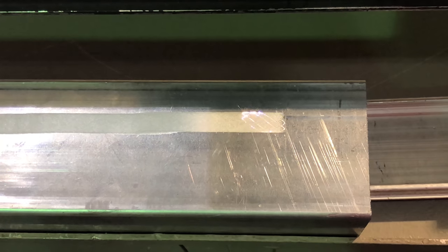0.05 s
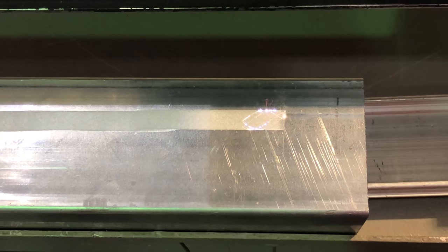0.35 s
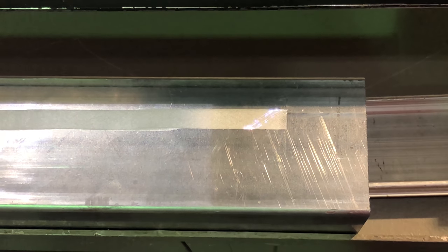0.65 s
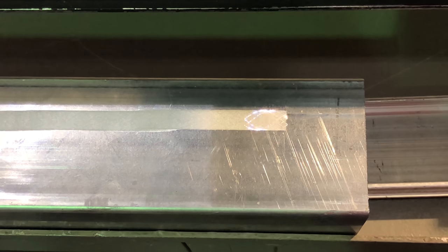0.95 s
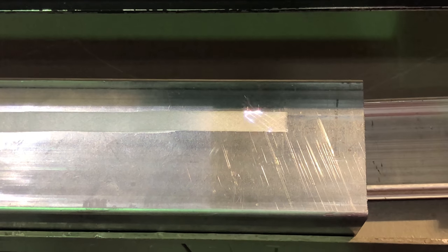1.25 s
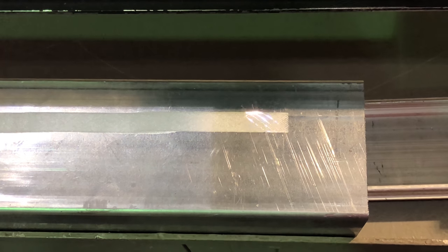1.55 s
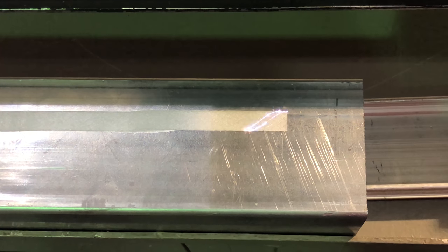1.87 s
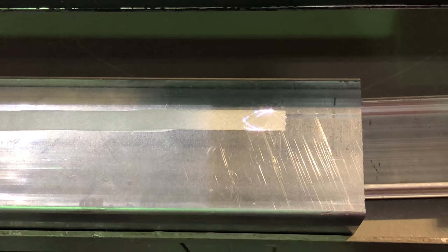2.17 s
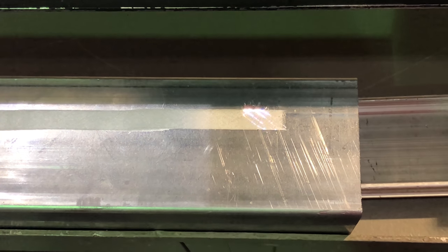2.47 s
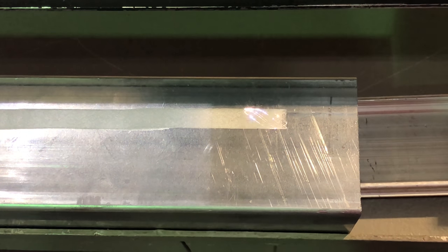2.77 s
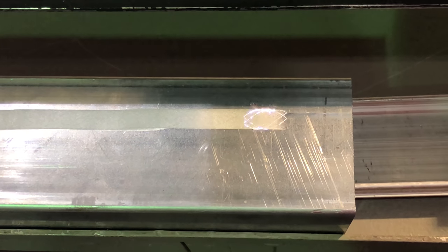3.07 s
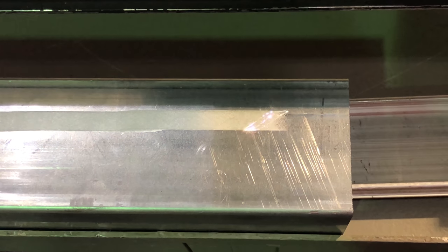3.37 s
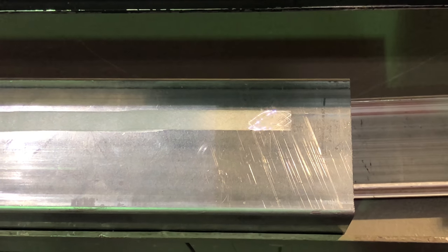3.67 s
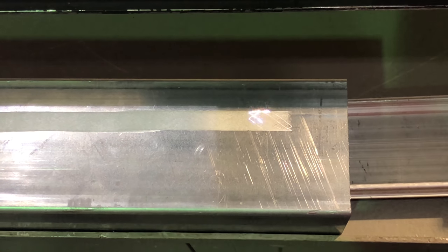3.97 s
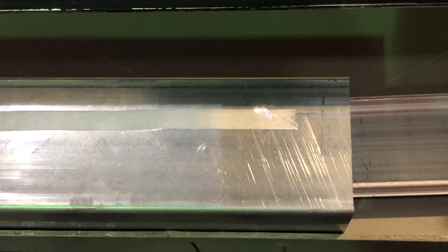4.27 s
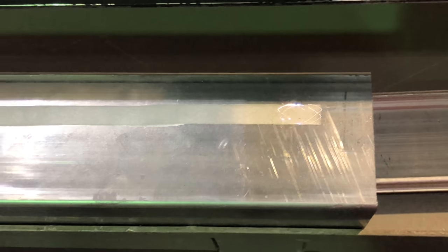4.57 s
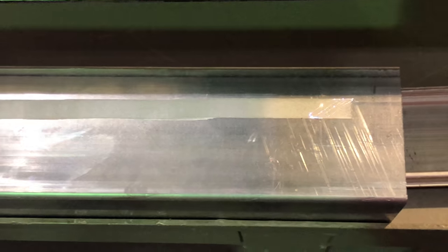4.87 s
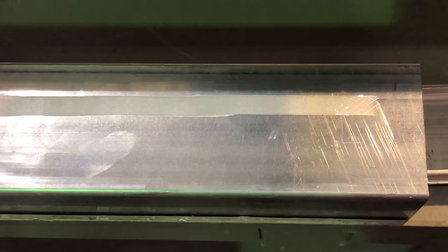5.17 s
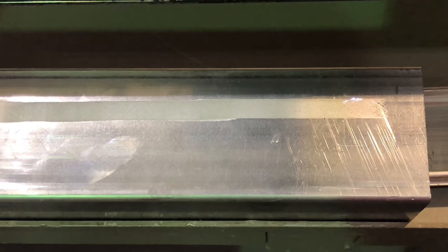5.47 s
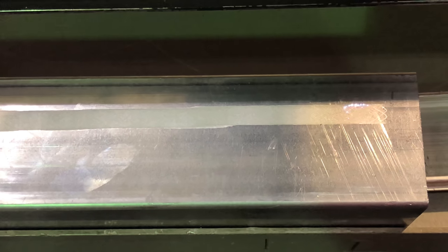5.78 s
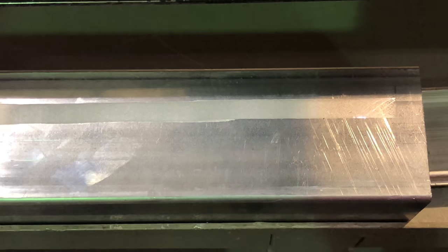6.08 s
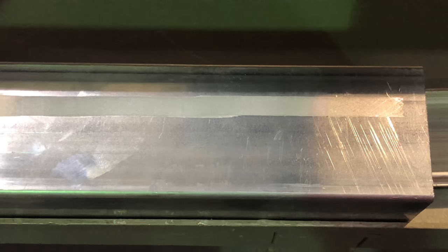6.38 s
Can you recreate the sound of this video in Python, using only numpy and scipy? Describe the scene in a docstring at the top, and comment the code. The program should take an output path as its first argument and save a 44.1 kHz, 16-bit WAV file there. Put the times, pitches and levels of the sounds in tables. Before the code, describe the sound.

A cleaning laser strips a steel tube with a fluttering sizzle and sharp snaps, over hissing air and machine hum.

```python
"""In a workshop, one microphone hears a handheld cleaning laser strip a steel tube.
Two mirrors sweep the spot; the coating boils off in a fluttering sizzle and flakes burst with snaps.
The scanner buzzes and an air jet hisses; behind them the power supply hums and its cooling fans run.
The microphone moves to a new place, so reflections from nearby metal colour the hiss differently
and the hum's upper partials grow."""
import sys
import numpy as np
from scipy import signal
from scipy.fft import rfft, irfft, next_fast_len
from scipy.io import wavfile
from scipy.ndimage import map_coordinates

SR = 44100
rng = np.random.default_rng(int(sys.argv[2]) if len(sys.argv) > 2 else 0)


def wrap_up_sound(samples):
    """Save the sound to the file named by the first command line argument, as 16-bit audio."""
    columns = np.atleast_2d(samples).T
    # keep every value between -1 and 1, then stretch to whole-number steps
    tamed = np.clip(columns, -1, 1)
    steps = np.round(tamed * 32767).astype(np.int16)
    wavfile.write(sys.argv[1], SR, steps)


N = 292383
T = np.arange(N) / SR
FAST_HZ, SLOW_HZ = 143.96, 129.98  # sweep rates of the two mirrors
BEAT_HZ = FAST_HZ - SLOW_HZ

# how hard the coating burns: t/s, relative level/dB
BURN_LEVEL = [(0.0, -37), (1.18, -35), (2.07, -35), (2.49, -34), (4.04, -36), (5.37, -38.5), (6.63, -39.5)]
# the microphone's move to a new place: t/s, position (0 first place, 1 second place)
MIC_SHIFT = [(0, 0.11), (3.6, 0.11), (4.5, 0.4), (5.2, 0.94), (6.63, 0.98)]
# resonances of the tube and the laser head: f/Hz, width/Hz, level/dB
METAL_RINGS = [(2600, 71, 2.5), (4067, 104, 2.5), (5200, 170, 1), (6980, 78, 4.5), (8960, 65, 2.5),
               (10700, 170, 1), (12870, 110, 6.5), (15350, 130, 3), (16500, 170, -11)]
# spectrum of a burst's bright edge: f/Hz, level/dB
BURST_EDGE = [(300, -39), (1500, 1), (4000, 0.5), (6500, 1.5), (9000, 1.5), (11500, 0.5), (13500, -9),
              (17000, -12)]


def amp(db):
    """Decibels to gain."""
    return 10 ** (np.asarray(db) / 20)


def unit(x):
    """Scale to rms 1."""
    return x / np.sqrt(np.mean(x ** 2) + 1e-20)


def along(points, hz):
    """Read (f/Hz, value) points on a log axis."""
    f, values = np.transpose(points)
    return np.interp(np.log(hz + 1), np.log(f + 1), values)


def bumps(rows, hz):
    """The sum in dB of (f/Hz, width/Hz, level/dB) peaks or notches."""
    return sum(db * np.exp(-((hz - centre) / width) ** 2) for centre, width, db in rows)


def curve(rows):
    """Read (t/s, value) rows at every sample."""
    return np.interp(T, *np.transpose(rows))


def wobble(rate):
    """A smooth random curve with rate knots a second."""
    return map_coordinates(rng.standard_normal(int(N * rate / SR) + 4), [T * rate])


def coloured(x, gain):
    """Filter x with a gain that depends on frequency."""
    size = next_fast_len(N + SR // 4)
    return irfft(rfft(x, size) * gain(np.fft.rfftfreq(size, 1 / SR)), size)[:N]


def tone(hz, db, drift, sway=0):
    """A sine of the given rms level; drift and sway shift its phase in radians."""
    phase = 2 * np.pi * (hz * T + rng.random()) + drift * wobble(3.96) + sway
    return np.sqrt(2) * amp(db) * np.sin(phase)


def lobe(hz, at, sharp):
    """A bump once per cycle, centred at a share of that cycle."""
    return np.exp(sharp * (np.cos(2 * np.pi * (hz * T - at)) - 1))


def burn_gain(level_db, follow):
    """Gain of a layer that follows the burn by so many dB per dB."""
    burn_db = curve(BURN_LEVEL)
    return amp(level_db + follow * (burn_db - burn_db.mean()))


def workshop(x):
    """The room's diffuse answer, 4 ms behind the direct sound and dying faster in the treble."""
    # reverberation time: f/Hz, t60/s
    decay_times = [(200, 0.79), (2000, 0.073), (12000, 0.052)]
    hz, t, noise = signal.stft(rng.standard_normal(SR // 2), SR, nperseg=256)
    decay = amp(-60 * t / along(decay_times, hz)[:, None])
    tail = signal.istft(noise * decay, SR, nperseg=256)[1]
    return signal.fftconvolve(x, np.pad(tail / np.linalg.norm(tail), (SR // 250, 0)))[:N]


def power_supply(air_db, mains_hz=59.97, hum_rise_db=2.5):
    """The background: mains hum, motor tones and the rush of cooling air."""
    # hum partials: multiple of the mains, level/dB with the microphone midway
    hum_partials = [(1, -62.5), (2, -43.5), (4, -50.5), (5, -77.5), (6, -66.5), (8, -74), (10, -65),
                    (14, -78)]
    # fan and pump tones: f/Hz, level/dB
    motor_tones = [(45, -64), (71.8, -59), (90, -66), (133.2, -56), (169.4, -74), (177.6, -66)]
    # spectrum of the fans' air: f/Hz, level/dB
    fan_air = [(18, -30), (30, -15), (48, 1), (75, 0), (115, 2), (200, -3), (280, -3.5), (430, -0.5),
               (530, -5.5), (850, -8), (2000, -11.5), (5000, -15.5), (16000, -13.5)]
    rise_db = hum_rise_db * (curve(MIC_SHIFT) - .5)  # the upper partials grow as the microphone moves
    hum = sum(tone(k * mains_hz, db + (k > 2) * rise_db, drift=.05) for k, db in hum_partials)
    motors = sum(tone(hz, db, drift=0.62) for hz, db in motor_tones)
    air = unit(coloured(rng.standard_normal(N), lambda hz: amp(along(fan_air, hz))))
    return hum + motors + amp(air_db + 0.48 * wobble(5.5)) * air


def air_jet(level_db, follow):
    """The air stream that keeps the lens clean: an even hiss whose level follows the burn."""
    # spectrum of the stream: f/Hz, level/dB
    stream = [(500, -11), (2500, -9), (5000, -1), (8500, 6), (12000, -5.5), (14500, -5), (16500, -1)]
    hiss = coloured(rng.standard_normal(N), lambda hz: amp(along(stream, hz) + bumps(METAL_RINGS, hz)))
    return burn_gain(level_db, follow) * unit(hiss)


def scanner(sway, buzz_db):
    """The sweeping spot buzzes; the beat of the two mirrors sways the upper partials most."""
    # buzz: multiple of the fast sweep, relative level/dB
    buzz_partials = [(2, -66), (4, -66), (5, -63), (6, -64), (7, -69), (9, -71), (10, -62.5), (11, -62.5),
                     (12, -65), (14, -65.5), (15, -65.5), (16, -65.5), (17, -72), (18, -65.5), (19, -64.5),
                     (22, -68)]
    # fine whine of the slow mirror: multiple of its sweep, relative level/dB
    whine_partials = [(61, -60), (62, -60), (63, -61), (64, -61)]
    beat = np.sin(2 * np.pi * BEAT_HZ * T)
    buzz = sum(tone(k * FAST_HZ, db, drift=0.24, sway=sway * k * beat) for k, db in buzz_partials)
    whine = sum(tone(k * SLOW_HZ, db, drift=.5, sway=1.6 * wobble(45)) for k, db in whine_partials)
    effort = unit(amp(curve(BURN_LEVEL)))
    return amp(buzz_db) * np.sqrt(effort) * buzz + effort * whine


def path(spectrum, notches, source, size=1024):
    """Minimum-phase response, of energy 1, from the spot to one place of the microphone."""
    hz = np.fft.rfftfreq(size, 1 / SR)
    level_db = along(spectrum, hz) + bumps(notches, hz) + bumps(METAL_RINGS, hz) + along(source, hz)
    cepstrum = irfft(np.log(amp(level_db)))
    cepstrum[1:size // 2] *= 2
    cepstrum[size // 2 + 1:] = 0
    response = irfft(np.exp(rfft(cepstrum)))
    return response / np.linalg.norm(response)


def at_microphone(pulses, source):
    """Pressure pulses with the given source spectrum, as they reach the moving microphone."""
    # colour of the work at the microphone's first and second place: f/Hz, level/dB
    first_spectrum = [(500, -21.5), (1300, -12), (2500, -9.5), (5000, -5.7), (7000, -5), (8500, 1),
                      (11000, -2), (13000, -5), (16500, -1.5)]
    second_spectrum = [(500, -13), (1300, -9.5), (2500, -7), (5000, -4.5), (7000, -3.5), (8500, 0),
                       (11000, -0.4), (13000, 3.5), (16500, -4)]
    # where reflections from the metal cancel the direct sound: f/Hz, width/Hz, level/dB
    first_notches = [(3686, 210, -7), (4490, 350, -5), (5750, 114, -11), (7250, 174, -25),
                     (9520, 210, -12.5), (12500, 190, -9), (13830, 100, -7), (14610, 310, -12)]
    second_notches = [(3370, 950, -3), (4520, 210, -6.5), (5810, 72, -27), (7250, 130, -9),
                      (10070, 280, -10.5), (12300, 760, -11), (13700, 280, -4.5), (14930, 320, -9)]
    first = signal.fftconvolve(pulses, path(first_spectrum, first_notches, source))[:N]
    second = signal.fftconvolve(pulses, path(second_spectrum, second_notches, source))[:N]
    shift = curve(MIC_SHIFT)
    return (1 - shift) * first + shift * second


def rocking():
    """The sweep figure's swing between its diagonals, +1 to -1, once per beat of the mirrors."""
    return np.cos(2 * np.pi * (BEAT_HZ * T - .2))


def absorbed_power():
    """Relative power taken up by fresh, uneven coating; the two sweeps beat 14 times a second."""
    # how much harder one diagonal burns: t/s, share of the power (the sign picks the diagonal)
    lean = [(0, -0.18), (2.8, -0.14), (3.5, 0.15), (5.3, .35), (6, -0.26)]
    dirty_side = lobe(SLOW_HZ, at=.74, sharp=1.1)
    leading_edge = lobe(FAST_HZ, at=0.94, sharp=3.2) * (.12 + dirty_side)
    far_edge = .75 * lobe(FAST_HZ, at=.44, sharp=13) * dirty_side ** 2
    # at the other end of the slow sweep the spot only grazes two corners
    grazes = lobe(FAST_HZ, at=.12, sharp=10) + lobe(FAST_HZ, at=.79, sharp=6.7)
    corners = .3 * lobe(SLOW_HZ, at=.27, sharp=7) * grazes
    # twice a beat the figure narrows to a diagonal and burns harder
    diagonal = lobe(2 * BEAT_HZ, at=.83, sharp=.25)
    power = (.03 + leading_edge + far_edge + corners) * diagonal
    patches = amp(wobble(22))
    return power / power.mean() * patches * (1 + curve(lean) * rocking())


def crackle(power, per_second, range_db, level_db, follow):
    """Small specks pop off under the spot, each with its own size."""
    chance, size = rng.random((2, N))
    pops = (chance < power * per_second / SR) * amp(-range_db * np.sqrt(size))
    return burn_gain(level_db, follow) * unit(at_microphone(pops, BURST_EDGE))


def spitting(power, per_second, surge_db, level_db, follow):
    """Thicker coating fries in dense, lower pops that come in little surges."""
    # spectrum of a pop: f/Hz, level/dB
    pop_spectrum = [(300, -37.5), (900, 0.5), (1600, 2), (2600, 5), (4000, 4.5), (6000, -0.5), (9000, -11),
                    (16000, -11)]
    popping = rng.random(N) < power * per_second / SR
    pops = popping * rng.standard_normal(N) * amp(surge_db * wobble(40))
    return burn_gain(level_db, follow) * unit(at_microphone(pops, pop_spectrum))


def lesser_flakes(power, per_second=5, edge_db=-20.5, body_db=-37.5, scatter_db=2):
    """Small flakes go by chance where the spot meets fresh coating; gives rows for snaps()."""
    chance, size = rng.random(N), rng.standard_normal(N)
    at = np.flatnonzero(chance < power * per_second / SR)
    burn_db = curve(BURN_LEVEL)
    size_db = burn_db[at] - burn_db.mean() + scatter_db * size[at]
    return list(zip(T[at], edge_db + size_db, body_db + size_db))


def snaps(power, edge_db, body_db, spray_db, spray_t60=0.0095, delay_s=.0013, body_lag_s=.0001):
    """A flake bursts in one shock pulse; the push of its vapour and a spray of debris follow."""
    # the loudest flakes: t/s, relative level/dB of the bright edge, the same of the low body
    loud_flakes = [(0.3471, -12, -34), (0.4165, -13, -24.5), (0.4625, -10, -24), (0.5314, -18, -26),
                   (0.5617, -12, -38), (0.6312, -11, -23.5), (0.6779, -11, -31), (0.7468, -23, -28.5),
                   (0.847, -17, -29), (0.9164, -7.5, -26), (0.9775, -7.5, -29), (1.0625, -14, -31),
                   (1.201, -16, -31.5), (1.2776, -8, -29), (1.493, -12.5, -34), (1.5319, -11.5, -36),
                   (1.9159, -16, -32), (2.039, -20, -29.5), (2.2546, -13.5, -30.5), (3.2919, -12, -32.5),
                   (4.6884, -15, -32), (4.804, -14, -37), (4.9732, -15.5, -35), (5.068, -18, -36.5),
                   (5.3131, -21, -36), (5.4667, -19, -35.5), (5.7636, -14.5, -44), (6.1175, -13, -43),
                   (6.124, -17, -34), (6.2707, -14.5, -37), (6.417, -10.5, -32), (6.4866, -10.5, -39),
                   (6.5007, -14, -40)]
    # spectrum of a burst's low body: f/Hz, level/dB
    burst_body = [(200, -13), (700, -2), (1300, 3.5), (2300, 7), (3500, 6), (5500, -7.5), (10000, -25.5)]
    edge, body = np.zeros((2, N + SR))
    t = np.arange(SR // 50) / SR
    for onset, bright_db, low_db in list(loud_flakes) + lesser_flakes(power):
        spray = amp(spray_db - 60 * t / spray_t60) * rng.standard_normal(len(t))
        burst = (t == 0) + spray
        start = round((onset + delay_s) * SR)
        edge[start:][:len(t)] += amp(bright_db + edge_db) * burst
        body[start + round(body_lag_s * SR):][:len(t)] += amp(low_db + body_db) * burst
    return at_microphone(edge[:N], BURST_EDGE) + at_microphone(body[:N], burst_body)


def sizzle(power, grain_db, flicker_db, level_db, follow):
    """Countless tiny puffs of vapour, stronger on fresh coating; the treble spurts with the beat."""
    # spectrum of a puff: f/Hz, level/dB
    puff_spectrum = [(1000, -3), (3000, -5.5), (6500, 1.5), (11000, 0.5), (13000, -4), (17000, -3)]
    # swell of each band as the rocking figure shifts the reflections: f/Hz, share of the amplitude
    band_swell = [(9000, -0.059), (10200, 0.068), (11600, 0.22), (12600, -0.17), (16500, -.1)]
    puffs = rng.standard_normal(N) * amp(grain_db * wobble(2500) + flicker_db * wobble(170))
    hiss = unit(at_microphone(puffs * np.sqrt(power), puff_spectrum))
    flutter = rocking() * coloured(hiss, lambda hz: along(band_swell, hz))
    return burn_gain(level_db, follow) * (hiss + flutter)


def scene():
    """The laser's work in front with a little of the room, the power supply behind it."""
    power = absorbed_power()
    work = sizzle(power, grain_db=2.5, flicker_db=1.5, level_db=-36.5, follow=1.44)
    work += crackle(power, per_second=240, range_db=19, level_db=-47.5, follow=.9)
    work += spitting(power, per_second=1700, surge_db=1.03, level_db=-42.5, follow=1.34)
    work += snaps(power, edge_db=6.5, body_db=21.5, spray_db=-25)
    head = scanner(sway=0.063, buzz_db=0.7) + air_jet(level_db=-44.0, follow=0.55)
    return (work + amp(-14.5) * workshop(work) + head + power_supply(air_db=-43.5))[None]


def record(dry, top_hz=17250):
    """One microphone channel, with nothing above the band limit."""
    return coloured(dry[0], lambda hz: hz < top_hz)[None]


dry = scene()
out = record(dry)
wrap_up_sound(out)
```